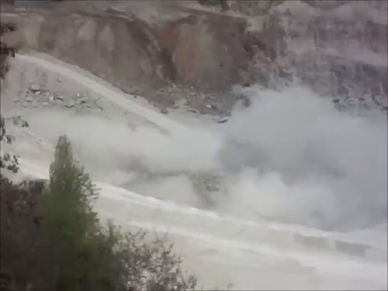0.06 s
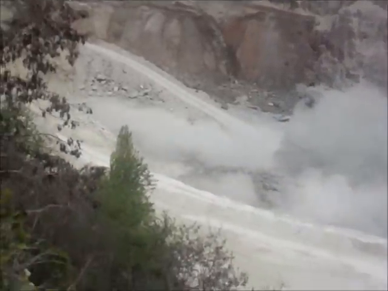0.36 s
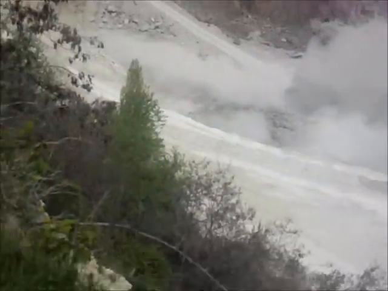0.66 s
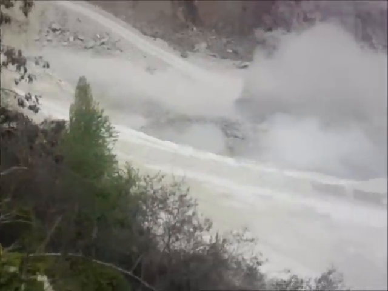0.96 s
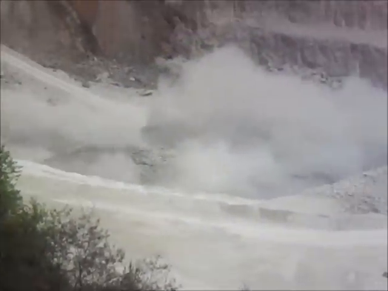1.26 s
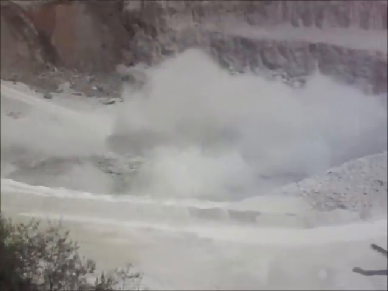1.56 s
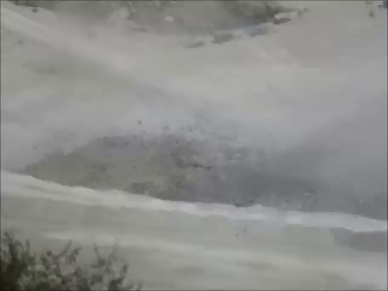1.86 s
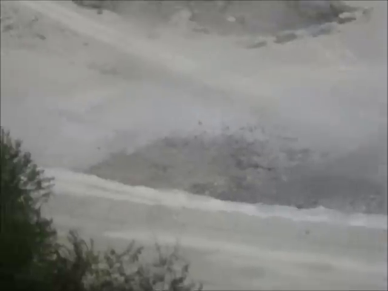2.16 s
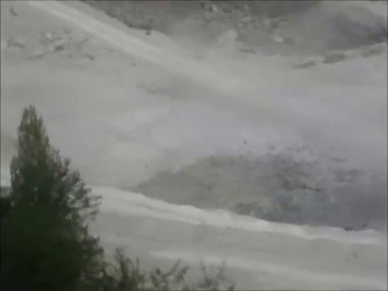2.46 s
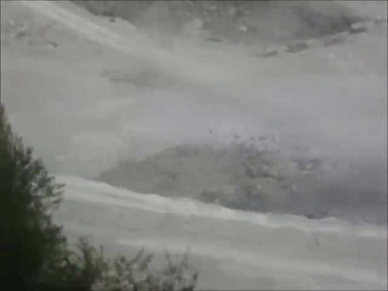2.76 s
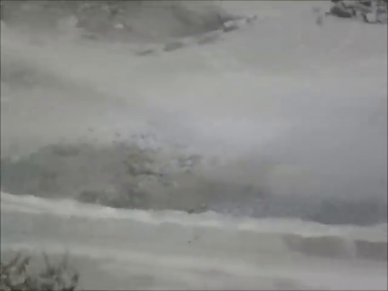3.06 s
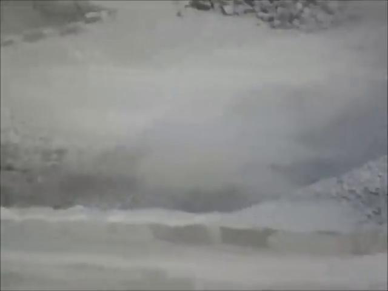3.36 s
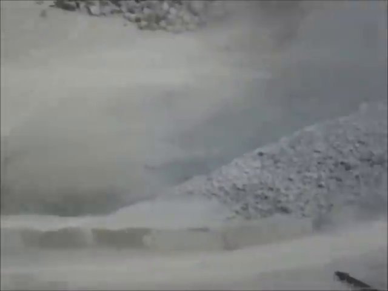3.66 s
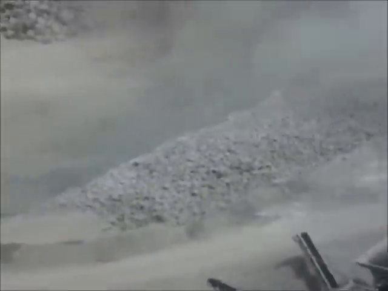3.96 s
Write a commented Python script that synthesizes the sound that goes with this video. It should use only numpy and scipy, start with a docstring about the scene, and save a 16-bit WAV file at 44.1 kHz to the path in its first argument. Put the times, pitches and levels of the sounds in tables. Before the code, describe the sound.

Wind rumbles on a microphone at the rim of an open quarry, buffeting it in low bumps over an even, distant rush. A brief rasp and light ticks come close by, then one sharp click before more gusts.

```python
"""The rim of an open quarry, one microphone out in the wind. The draught rumbles over it and eddies
buffet it in low bumps, some dull, some brighter and spitting. Far across the pit lies an even rushing,
with a faint whine and a thin, rising hiss at first. Close by come small ticks, a short stick-slip rasp
and one sharp click of hard contact. The recorder is narrow-band and the click overloads it."""
import sys
import numpy as np
from scipy import signal
from scipy.fft import rfft, irfft
from scipy.io import wavfile

SR = 44100
rng = np.random.default_rng(int(sys.argv[2]) if len(sys.argv) > 2 else 0)


def dump(signal):
    """Clip the signal to [-1, 1] and save it as 16-bit WAV at the path in sys.argv[1]."""
    limited = np.clip(np.atleast_2d(signal).T, -1, 1)
    pcm = np.round(limited * 32767).astype(np.int16)
    wavfile.write(sys.argv[1], SR, pcm)


N = 176400


def undb(db):
    """Decibels to gain."""
    return 10 ** (np.asarray(db) / 20)


def unit(x):
    """Scale to rms 1."""
    return x / np.sqrt(np.mean(x ** 2) + 1e-18)


def times():
    """Time of every sample in seconds."""
    return np.arange(N) / SR


def freqs(size):
    """Frequency of every bin, at least 1 Hz."""
    return np.maximum(np.arange(size // 2 + 1) * SR / size, 1)


def noise(gain):
    """Noise of rms 1 with the given gain per bin."""
    return unit(irfft(gain * rfft(rng.standard_normal(2 * len(gain) - 2))))


def band(f, low_hz, high_hz, slope):
    """Gain of a flat band with soft edges; slope is the steepness of the upper one."""
    return 1 / np.sqrt((1 + (low_hz / f) ** 2) ** 2 * (1 + (f / high_hz) ** (2 * slope)))


def walk(rate_hz, size=N):
    """Smooth random drift of spread 1."""
    return noise(np.exp(-(freqs(size) / rate_hz) ** 2))


def add(out, start_s, sound):
    """Mix a short sound in at its time."""
    at = int(start_s * SR) + np.arange(len(sound))
    inside = (at >= 0) & (at < N)
    out[at[inside]] += sound[inside]


def burst(hz, width_hz, decay_s, size=4096):
    """A brief scrape of noise through one resonance."""
    envelope = np.exp(-np.arange(size) / SR / decay_s)
    edges = [hz - width_hz / 2, hz + width_hz / 2]
    resonance = signal.butter(3, edges, "bandpass", fs=SR, output="sos")
    ring = signal.sosfilt(resonance, rng.standard_normal(size) * envelope)
    return unit(ring) * np.sqrt(np.mean(envelope ** 2))


def draught(flutter_db=2.8):
    """Air flowing over the microphone makes a fluttering rumble."""
    # Each row: time in seconds, level in dB.
    strength = [(0, -34), (0.081, -39), (0.419, -36.5), (.5, -30), (.63, -40), (0.719, -34.5), (1.1, -31.5),
                (1.199, -39), (1.45, -37.5), (1.75, -45), (1.9, -52), (2.05, -51.5), (2.169, -40),
                (2.549, -33), (2.751, -50.5), (3.0, -43.5), (3.2, -41.5), (3.45, -48), (3.65, -48),
                (4.0, -46)]
    db = np.interp(times(), *np.array(strength).T) + flutter_db * walk(22)
    return undb(db) * noise(band(freqs(N), low_hz=12, high_hz=113, slope=2.09))


def far_rush(hollow_from_s=1.7, crossfade_s=0.25, wander_db=0.25, flicker_db=1.1):
    """Rushing from far across the pit: three bands swell on their own, and the colour turns hollow."""
    # The swells. Each row: time in seconds, then level in dB of the low, middle and high band.
    swells = [(0, -43.5, -44.5, -51), (.35, -47, -46, -52.5), (.75, -46, -48, -48.5),
              (1.05, -46.5, -45.5, -51), (1.5, -44, -47.5, -49.5), (1.7, -44, -50, -52.5),
              (1.95, -49, -48.5, -55), (2.4, -48.5, -47.5, -54), (2.75, -47.5, -47.5, -55),
              (2.96, -47, -46.5, -55), (3.03, -41, -43.5, -53), (3.148, -46.5, -46, -53.5),
              (3.26, -45, -46, -52), (3.6, -45, -44.5, -53.5), (3.8, -42.5, -42, -51), (4.0, -47, -46, -53)]
    # The four edges of those bands in Hz.
    edges = [150, 1480, 3100, 7000]
    # The colour, open at first and hollow later. Each row: frequency in Hz, relative level in dB.
    open_colour = [(190, -1), (420, -4.5), (720, .5), (920, -1.5), (1150, 3.5), (1550, -3.5), (1720, 0),
                   (2250, -2), (2520, -0.5), (2880, -4.5), (3400, -4), (3850, -5), (4500, -8.5),
                   (5000, -12), (5500, -21.5)]
    hollow_colour = [(190, 3), (470, -7), (640, 0.5), (820, 2), (1020, -5.5), (1210, 2), (1480, -5),
                     (1900, 0), (2200, 0), (2400, -3), (2740, 0), (3000, -8), (3300, -4), (3900, -7.5),
                     (4300, -10), (5000, -16), (5500, -24.5)]
    f, out = freqs(N), np.zeros(N)
    colours = np.array(open_colour).T, np.array(hollow_colour).T
    open_gain, hollow_gain = (undb(np.interp(np.log(f), np.log(hz), db)) for hz, db in colours)
    hollow_share = np.clip((times() - hollow_from_s) / crossfade_s, 0, 1)
    when, *levels = np.array(swells).T
    for low, high, level in zip(edges, edges[1:], levels):
        in_band = (f >= low) * (f < high)
        air = np.sqrt(1 - hollow_share) * noise(open_gain * in_band)
        air += np.sqrt(hollow_share) * noise(hollow_gain * in_band)
        drift_db = -wander_db * walk(4) + flicker_db * walk(25)
        out += air * undb(np.interp(times(), when, level) + drift_db)
    return out


def thin_hiss(width_hz=180):
    """A faint, narrow hiss glides upward, then sinks a little as it dies away."""
    # Each row: time in seconds, centre in Hz, level in dB.
    glide = [(0, 3000, -51.5), (.38, 3056, -56.5), (.55, 3650, -61), (.75, 4060, -50.5), (1.15, 3950, -62),
             (1.698, 3640, -60.5), (2.0, 3600, -80.5)]
    when, hz, db = np.array(glide).T
    carrier = np.sin(2 * np.pi * np.cumsum(np.interp(times(), when, hz)) / SR)
    return undb(np.interp(times(), when, db)) * unit(carrier * walk(width_hz))


def far_whine(pitch_hz=1130, waver_hz=4.6, level_db=-45.5, end_s=0.34, fade_s=0.25):
    """A faint, wavering tone in the distance that soon fades."""
    fade = np.clip((end_s - times()) / fade_s, 0, 1)
    hz = pitch_hz + waver_hz * walk(40)
    return undb(level_db) * fade * unit(np.sin(2 * np.pi * np.cumsum(hz) / SR))


def buffets(spits_above_hz=950, spit_rate_hz=110, spit_depth_db=8.5, size=16384):
    """Each eddy swells and dies on the microphone as a low bump whose upper part breaks into spits."""
    # Each row: middle in seconds, length in seconds, level in dB, upper edge in Hz.
    eddies = [(0.091, 0.07, -28, 94), (0.264, 0.0044, -20.5, 770), (0.278, 0.014, -22, 120),
              (.543, 0.028, -22, 250), (.584, 0.0085, -22.5, 370), (0.718, 0.026, -27, 219),
              (0.798, 0.021, -26.5, 110), (.878, 0.051, -23, 100), (.897, 0.023, -31.5, 500),
              (1.015, 0.012, -33, 600), (1.068, 0.027, -24.5, 635), (1.14, 0.024, -25, 305),
              (1.272, .015, -37, 320), (1.288, 0.014, -25, 360), (1.396, 0.015, -26.5, 200),
              (1.425, .016, -25, 737), (1.53, 0.046, -26.5, 65.3), (1.561, 0.046, -37, 400),
              (1.645, 0.03, -34.5, 330), (1.712, 0.021, -25.5, 50), (1.799, 0.03, -26.5, 38),
              (1.813, 0.0046, -30.5, 350), (2.131, 0.02, -23, 346), (2.155, 0.01, -16, 623),
              (2.17, 0.023, -28.5, 520), (2.225, 0.18, -32.5, 367), (2.292, 0.013, -22.5, 680),
              (2.312, 0.019, -21.5, 607), (2.347, 0.045, -30.5, 520), (2.383, 0.0059, -17.5, 590),
              (2.396, 0.024, -25.5, 420), (2.423, 0.011, -25, 680), (2.441, 0.0091, -19.5, 590),
              (2.453, 0.017, -21, 397), (2.559, 0.065, -30, 346), (2.853, 0.026, -28.5, 263),
              (2.928, 0.12, -31, 204)]
    out, f = np.zeros(N), freqs(size)
    t = (np.arange(size) - size / 2) / SR
    for middle, length, db, edge_hz in eddies:
        envelope = np.exp(-(1.74 * t / length) ** 2)
        swirl = noise(band(f, 0.09 * edge_hz, edge_hz, slope=2.8) / np.sqrt(f))  # leans to the bass
        body = irfft(rfft(swirl) / (1 + (f / spits_above_hz) ** 4))
        spits = unit(undb(spit_depth_db * walk(spit_rate_hz, size)))
        bump = (body + spits * (swirl - body)) * envelope
        add(out, middle + t[0], undb(db) * unit(bump) * np.sqrt(np.mean(envelope ** 2)))
    return out


def ticks():
    """Light ticks near the microphone, each a few milliseconds of ringing noise."""
    # Each row: start in seconds, level in dB, centre in Hz, width in Hz, decay in seconds.
    touches = [(0.737, -31, 2550, 3000, 0.0033), (.746, -37, 3820, 2380, 0.00172),
               (.801, -40, 4970, 700, .004), (1.8144, -27, 2700, 3170, .002),
               (1.8662, -34.5, 4810, 550, 0.005), (3.129, -40.5, 4500, 800, 0.0042)]
    out = np.zeros(N)
    for start, db, hz, width_hz, decay_s in touches:
        add(out, start, undb(db) * burst(hz, width_hz, decay_s))
    return out


def rasp():
    """Close by, something sticks and slips in a quick run of catches."""
    # Each row: start in seconds, level in dB.
    catches = [(0.7917, -30), (0.801, -27), (0.812, -23.5), (0.82, -24.5), (.825, -26.5), (0.833, -29)]
    out = np.zeros(N)
    for start, db in catches:
        add(out, start, undb(db) * burst(hz=2575, width_hz=870, decay_s=0.0043))
    return out


def click(start_s=1.71124, gain_db=15, rise_s=0.0011):
    """A hard contact right at the microphone, dead within milliseconds."""
    # Its ringing. Each row: frequency in Hz, relative level in dB, seconds to fall by 60 dB.
    modes = [(813, -10, 0.0071), (995, -27, .02), (2110, 0.5, 0.0029), (3170, -22.5, 0.013),
             (3466, 0, 0.0044), (4983, -1, 0.0029)]
    t = np.maximum(times() - start_s, 0)
    ring = sum(undb(db - 60 * t / t60) * np.sin(2 * np.pi * hz * t) for hz, db, t60 in modes)
    attack = 1 - np.exp(-(t / rise_s) ** 2)
    return undb(gain_db) * ring * attack


def scene():
    """Wind, distance and close sounds meet at one microphone on the rim."""
    wind = draught() + buffets()
    background = far_rush() + thin_hiss() + far_whine()
    close = ticks() + rasp() + click()
    return (wind + background + close)[None]


def record(dry, bandwidth_hz=5250, bias=0.014, top_hz=15500):
    """A narrow-band recorder with a small bias clips at full scale, then trims the highest treble."""
    narrow = signal.sosfiltfilt(signal.cheby1(10, 0.1, bandwidth_hz, fs=SR, output="sos"), dry)
    clipped = np.clip(narrow + bias, -1, 1)
    return signal.sosfilt(signal.ellip(8, 0.1, 70, top_hz, fs=SR, output="sos"), clipped)


dry = scene()
out = record(dry)
dump(out)
```